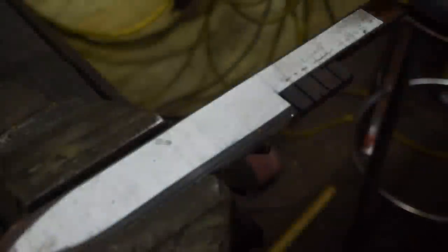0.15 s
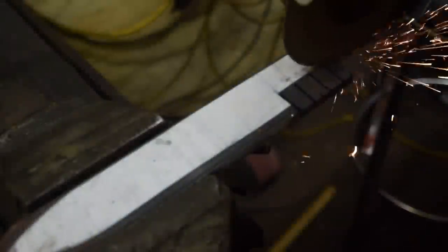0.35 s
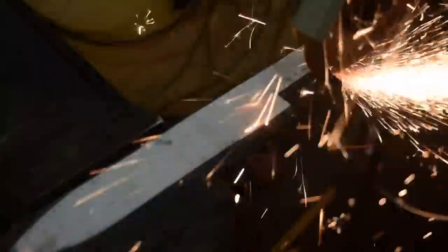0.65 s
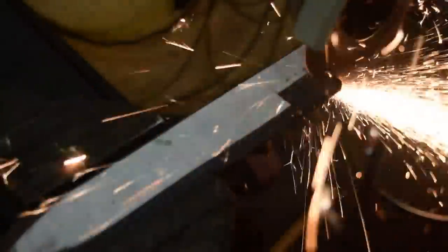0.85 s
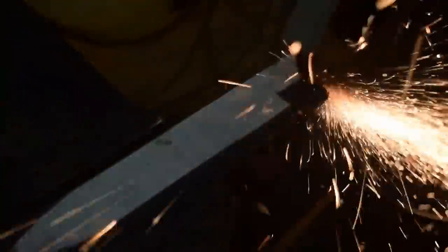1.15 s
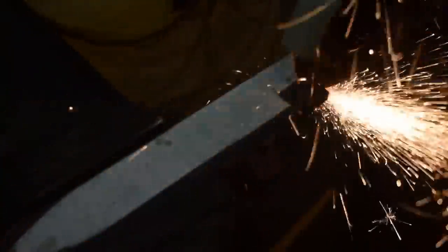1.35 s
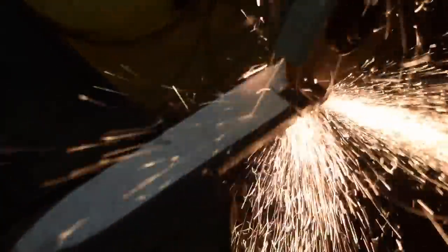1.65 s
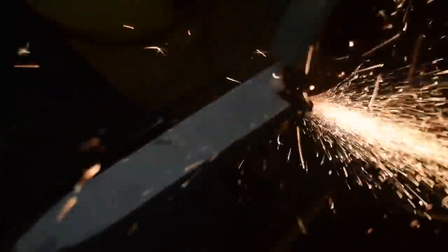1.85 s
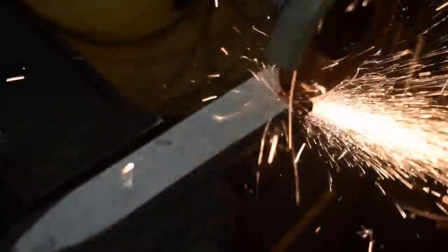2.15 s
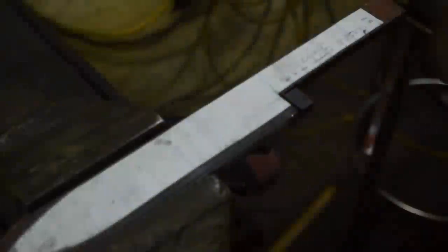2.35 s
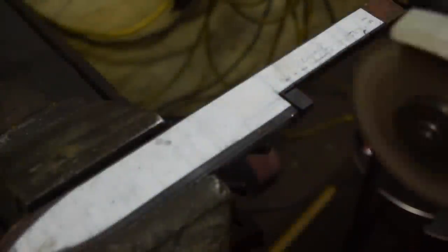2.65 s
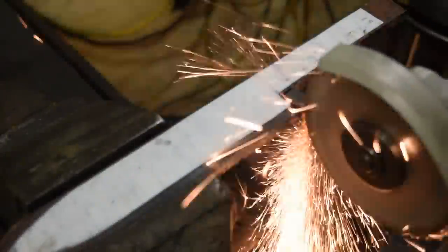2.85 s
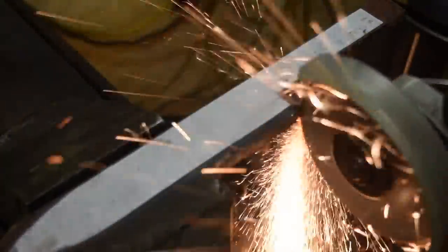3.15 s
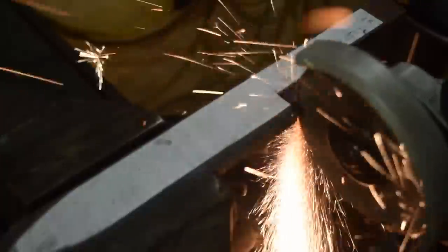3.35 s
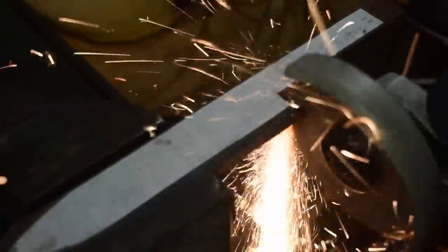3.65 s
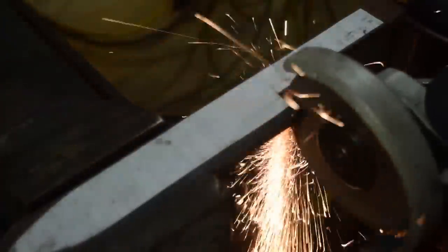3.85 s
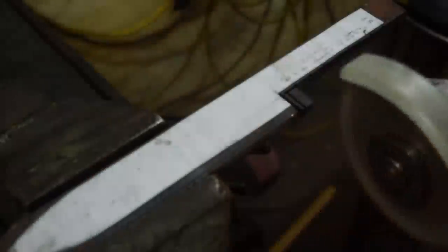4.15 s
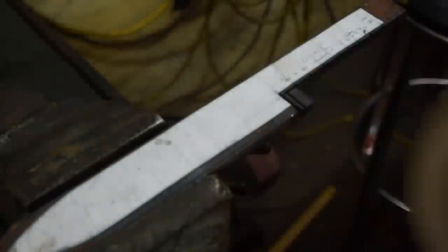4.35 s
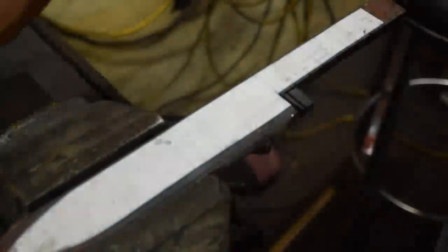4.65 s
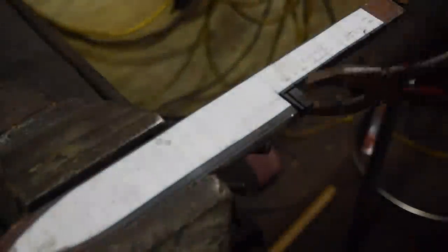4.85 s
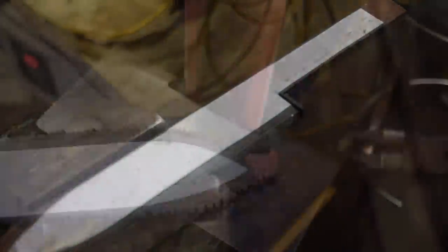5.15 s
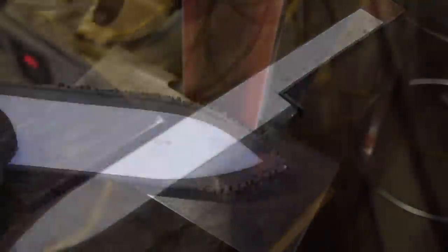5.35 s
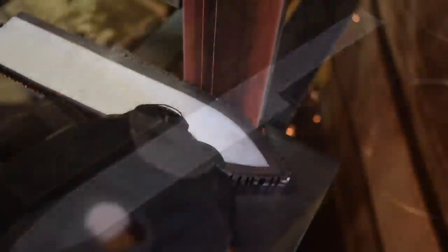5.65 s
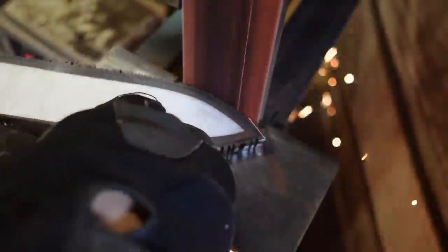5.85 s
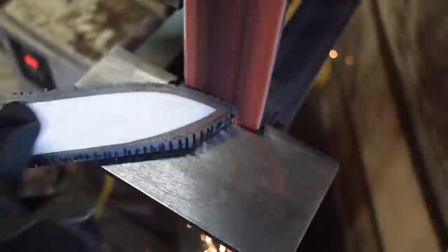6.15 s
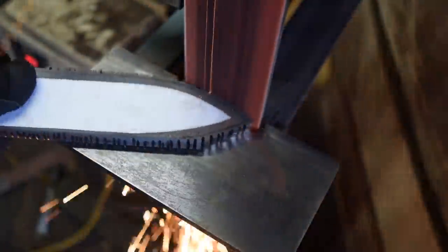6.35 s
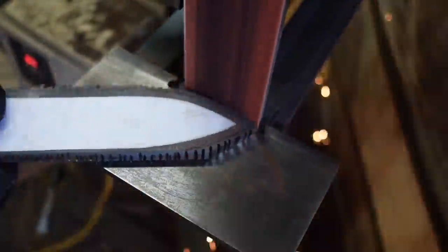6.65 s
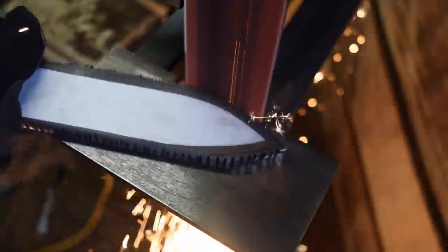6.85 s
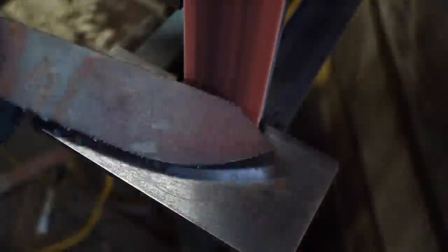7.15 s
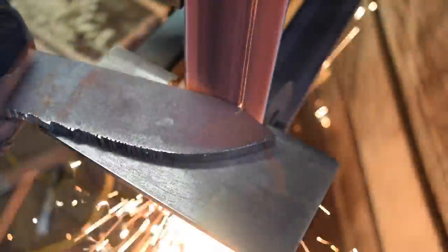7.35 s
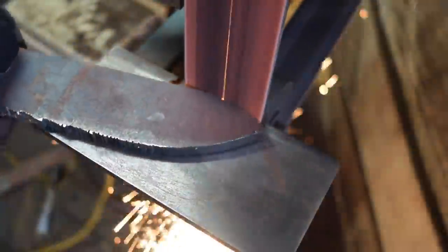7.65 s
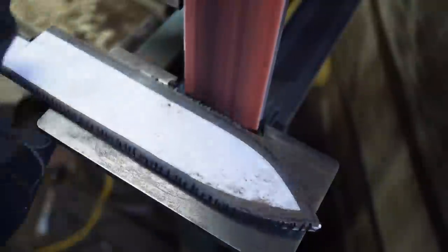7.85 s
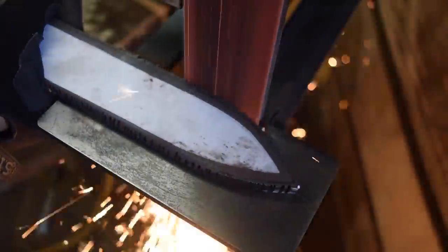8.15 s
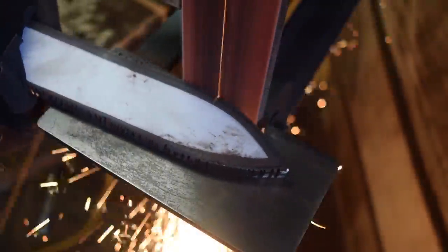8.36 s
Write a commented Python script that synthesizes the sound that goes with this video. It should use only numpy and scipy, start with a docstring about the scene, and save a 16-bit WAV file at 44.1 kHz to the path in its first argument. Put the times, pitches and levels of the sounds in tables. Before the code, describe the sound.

In a workshop, heard very close and almost mono, an angle grinder spins with a bright airy rush, scuffs steel, then cuts in two long gritty bursts with a squealing, sagging motor whine. It coasts down amid small steel clinks. A belt grinder swells up, buzzing and whining over hiss, and a blade blank is pressed on it five times with bright, sizzling screeches. Everything sounds fast and high-pitched, as if sped up.

```python
"""Shaping a steel knife blank in a workshop, heard close by, all fast and high-pitched as in a time-lapse.
From 0 s an angle grinder spins free: shaped noise with gliding whistles. At 0.46 s it grazes the steel, then
cuts at 0.55-2.30 s (one short break) and 2.87-4.20 s: gritty noise and motor tones that sag at each bite.
From 4.48 s it coasts down and steel clinks: short noise bursts. From 4.94 s a belt grinder swells in, a buzzing
whine of overtones over hiss; from 5.61 s the blank is pressed on it five times: grit noise through resonances."""
import sys
import numpy as np
from scipy import signal
from scipy.fft import rfft, irfft
from scipy.io import wavfile

SR = 44100
rng = np.random.default_rng(int(sys.argv[2]) if len(sys.argv) > 2 else 0)


def file_out(sig):
    """Save sig as 16-bit WAV at sys.argv[1]."""
    # one column per channel
    cols = np.atleast_2d(sig).T
    # limit, then scale
    lim = np.clip(cols, -1, 1)
    pcm = np.round(lim * 32767).astype(np.int16)
    wavfile.write(sys.argv[1], SR, pcm)


N = 375291
T = np.arange(N) / SR  # t/s
BINS = np.fft.rfftfreq(N, 1 / SR)  # f/Hz
EDGE_HZ = 15800  # upper band limit

# Angle grinder: disc, motor and gears
# Whistles of the disc: (width/Hz, rows of [t/s, f/Hz, level/dB])
WHISTLES = [ (150, [(0, 9100, -30), (.25, 9060, -34), (.45, 8500, -38)]), (120, [(1.93, 4300, -48),
            (1.98, 4630, -32), (2.01, 4900, -40)]), (80, [(2.3, 9700, -30), (2.45, 9840, -37),
            (2.88, 9900, -29)]), (25, [(2.38, 2860, -50), (2.55, 2900, -47), (2.86, 2870, -49)]),
            (40, [(3.94, 11580, -35), (4.04, 11700, -35)]), (40, [(4.08, 10700, -27), (4.19, 10750, -31)]),
            (59.3, [(4.03, 2700, -52), (4.1, 1390, -48), (4.16, 1400, -49)]), (20, [(4.25, 4730, -41),
            (4.36, 3700, -45), (4.48, 2755, -43.5), (4.56, 2210, -47.5), (4.64, 1770, -57)]),
            (1500, [(4.2, 12100, -47), (4.35, 10000, -29), (4.48, 8900, -27.5), (4.6, 8950, -26.5),
            (4.75, 8600, -42)]), (250, [(4.72, 6260, -40), (4.84, 6350, -48), (4.95, 6200, -47)])]
# Spectrum of the disc spinning free: [f/Hz, level/dB per Hz]
DISC_FREE = [(18, -60), (30, -21), (59, -24), (381, -23.5), (677, -24), (2510, -23.5), (2860, -23),
             (3090, -16.5), (5800, -6.5), (7350, -7.5), (10100, -3.5), (10900, -5.5), (15700, 2.5)]
# Spectrum of the disc in the cut: [f/Hz, level/dB per Hz]
DISC_CUT = [(18, -53), (30, -17.5), (677, -18.5), (752, -17), (1030, -18.5), (1170, -17.5), (1650, -16.5),
            (2710, -17.5), (6110, -5.5), (6610, -3), (7540, -6.5), (11800, -3), (15700, 4.5)]
# Rush of the free disc before its trims: [rumble level/dB, rasp level/dB, fizz level/dB]
FREE_DB = (-41.5, -34.5, -21)
# Change once the grinder is turned over for the last cut: [rumble/dB, rasp/dB, fizz/dB]
TURNED_DB = (-1, 3, -2)
# Extra as the disc bites: [rumble/dB, rasp/dB, fizz/dB]
BITE_DB = (2.5, 1, 1.5)
# Fading as the disc coasts down: [rumble/(dB/s), rasp/(dB/s), fizz/(dB/s)]
COAST_DB_PER_S = (21.5, 15, 47.5)
# Change near the end of the coast, subtracted: rumble and rasp drop, fizz lifts a little:
# [rumble/dB, rasp/dB, fizz/dB]
LATE_COAST_DB = (5, 14, -3)
TURN_S, COAST_S, LATE_COAST_S = 2.52, 4.476, 4.745  # turned over, starts to coast, late change
BITE_S = 0.23  # how fast the bite's extra dies away
# Disc on steel, levels before trims: [from t/s, to t/s, loaded rotor pitch f/Hz, sag time/s,
# gear whine level/dB, rumble level/dB, rasp level/dB, fizz level/dB]
CUTS = [(0.459, .5, 1400, .04, -50, -34, -27.5, -36), (.55, 2.113, 1110, .042, -35, -42, -35.5, -26.5),
        (2.144, 2.297, 1122, .04, -34, -42.5, -36, -25.5), (2.869, 4.196, 1150, .19, -35, -41, -32.5, -26)]
# Upper orders of the rotor, one list before and one after the turn: [multiple of rotor pitch, level/dB]
GEAR_ORDERS = [
    [(7, -8.5), (9, -8.5), (11, -11), (12, -4), (13, 3.5), (14, 3)],
    [(9, -9), (11, -9), (12, -3), (13, 5)],
]
# The hand eases off and the rotor picks up: [t/s, half length/s, pitch rise/Hz]
EASINGS = [(0.936, 0.033, 15.8), (1.06, .04, 12), (1.207, .075, 44), (1.431, 0.097, 12),
           (1.67, 0.0348, 10.9), (1.9, .12, 44), (4.132, 0.2, 176)]
# The blade squeals on the rotor's 6th order: [t/s, half length/s, level/dB]
SQUEALS = [(0.799, .1, -34.5), (.93, 0.095, -26.5), (1.193, 0.056, -30.5), (1.32, .03, -33),
           (1.56, 0.091, -25.5), (1.658, .045, -22.5), (1.9, 0.15, -30.5), (2.086, 0.025, -36),
           (2.192, 0.018, -23.5), (3.44, 0.055, -43)]
SQUEAL_REST_DB = -42.5
FREE_HZ = 1450  # rotor pitch with no load
EASED_DB, EASED_HZ = 5.5, 40  # most the gears gain, and the pitch rise that brings most of it
# Wavering low whistles during the cuts, one list each: [t/s, centre f/Hz, swings per s, level/dB]
WARBLES = [
    [(1.75, 1097, 7.6, -50), (1.87, 500, 12, -50), (1.98, 281.3, 12, -55), (2.25, 324, 12, -54)],
    [(2.87, 702, 7.3, -49), (3.12, 858, 15.4, -44.5), (3.45, 753.5, 24, -49), (3.76, 749, 29, -49),
     (3.98, 596, 8.5, -62)],
]
# Strength of each warbling tone, the folded-down one first: [level/dB]
WARBLE_DB = (-5.5, 1, 0.5, 0, 3)

# Steel on steel
# Knocks and scrapes: [t/s, level/dB, ringing f/Hz, length/s, share of broad scrape 0-1]
KNOCKS = [(0.458, -21, 5800, 0.022, 0.98), (0.486, -22, 5700, 0.011, 1), (0.534, -26, 4500, .008, .9),
          (0.626, -22.5, 4730, .006, 1), (1.149, -23, 4500, .01, 0.98), (4.716, -25.5, 4300, 0.0031, 0.85),
          (4.936, -27, 6800, 0.0085, 0.06), (4.975, -44, 7400, .007, .3), (5.036, -39, 6750, 0.013, 0.2),
          (5.19, -39, 6200, .012, 0.3), (5.4455, -19.5, 6060, 0.0058, 0.37),
          (5.673, -30.5, 1800, 0.012, 0.8), (6.585, -23, 3970, 0.0058, 0.96),
          (7.248, -32, 3450, 0.024, 0.28)]
# Spectrum of the broad scrape: [f/Hz, level/dB per Hz]
SCRAPE = [(60, -9), (400, -13), (1400, -1), (2200, -8), (3500, 2.5), (7500, 1.5), (10000, 10), (15000, -11)]

# Belt grinder and blank
# Whine of the wheels and bearings before trims: [f/Hz, level/dB]
WHINE = [(3827, -47), (5740, -44), (6218, -43), (6288, -41), (6455, -44), (6697, -35), (7171, -43),
         (7652, -38), (8129, -35), (9561, -39), (10040, -32), (10519, -36), (10998, -31), (11316, -38),
         (11477, -32), (11956, -34), (12575, -33), (12909, -35), (13205, -34), (13388, -38), (13647, -40),
         (13867, -39), (14465, -34), (14863, -40), (15089, -33), (15299, -38)]
# Turning parts: [f/Hz, level of all their overtones/dB]
WHEELS = [(481.7, -31.5), (208.2, -28.5), (120.8, -35.5)]
# Spectrum of the running belt: [f/Hz, level/dB per Hz]
BELT_AIR = [(18, -71), (30, -24.5), (212, -24.5), (306, -25), (418, -25), (2110, -25), (2340, -23.5),
            (6470, -7.5), (15300, 0)]
SWELL_START_S, SWELL_S, SWELL_POWER, SWELL_DB = 4.941, 0.67, 1.59, 1
BELT_SAG, BELT_LAG_S = .035, .05  # share of speed lost under load, and how slowly the wheels follow
# Blank pressed on the belt, levels before trims:
# [from t/s, to t/s, rasp level/dB, screech level/dB, rumble level/dB]
PASSES = [(5.612, 6.221, -37.5, -21.5, -42), (6.281, 6.719, -38, -19.5, -43.5),
          (6.795, 7.165, -40, -20, -44.5), (7.275, 7.769, -42.5, -18.5, -45),
          (7.965, 8.6, -39.5, -20.5, -44.5)]
# Spectrum of grit on steel: [f/Hz, level/dB per Hz]
GRIT = [(2800, -36.5), (3300, -4), (3700, -6), (4400, -4), (5200, -21), (5900, -8), (6800, -9),
        (7900, -7.5), (8900, -5), (9600, -0.5), (10200, 7), (11900, 3.5), (12600, 5), (15700, -13)]
# Bending modes of the blank: [f/Hz, width/Hz, level against the rasp/dB]
BENDING = [(3805, 140, -7), (4520, 260, -6), (5980, 150, -2.5), (8160, 430, 2)]
# Resonances of the blank against the belt, before the screech trim: [f/Hz, width/Hz, level/dB]
BLANK = [(10210, 450, -7.5), (11200, 210, -8), (11700, 130, -13.5)]
TOUCH_S, TOUCH_RUMBLE_DB, TOUCH_RASP_DB = 0.032, 4.5, 2.5  # rough scuff at the start of a pass
SETTLE_S, SETTLE_DB = .08, 1.5  # the screech builds as the blank settles on the belt
SLIDE_FROM, SLIDE_TO = 0.96, 1.037  # retuning of the bending modes along each pass
IDLE_RUMBLE_DB = -44

# Faint diffuse side, mostly low: [f/Hz, side level against mid/dB]
SIDE_DB = [(300, -11.5), (1000, -15), (2500, -37.5), (8000, -54.5)]


def amp(db):
    """Decibels to gain."""
    return 10 ** (np.asarray(db) / 20)


def unit(x):
    """Scales to rms 1."""
    return x / np.sqrt(np.mean(x ** 2) + 1e-20)


def curves(rows):
    """Each column of a table after the time, joined by straight lines in time."""
    s, *columns = np.transpose(rows)
    return [np.interp(T, s, column) for column in columns]


def read(points, hz):
    """A spectrum's gain at hz."""
    f, db = np.transpose(points)
    return amp(np.interp(np.log(hz + 1), np.log(f + 1), db))


def gate(start, end, fade=0.0058):
    """One between two times, with ramps of fade seconds centred on them."""
    return np.clip(np.minimum(T - start, end - T) / fade + .5, 0, 1)


def bump(s, half_length):
    """A smooth hump of height one around a time."""
    return np.exp(-((T - s) / half_length) ** 2)


def since(start):
    """Seconds since a time; zero before it."""
    return np.maximum(T - start, 0)


def white():
    """Plain noise."""
    return rng.standard_normal(N)


def colour(x, gain):
    """Filters by a gain per frequency; rms 1."""
    return unit(irfft(rfft(x) * gain, N))


def drift(rate):
    """Random wandering up to about rate per second; rms 1."""
    s = np.arange(0, T[-1] + 1, 1 / 2000)
    smoothing = 1 + (np.fft.rfftfreq(len(s), s[1]) / rate) ** 2
    wander = irfft(rfft(rng.standard_normal(len(s))) / smoothing, len(s))
    return unit(np.interp(T, s, wander))


def flutter():
    """Gain of a tone that keeps breaking off and coming back."""
    return np.clip(1 + .7 * drift(30), 0, 2)


def above(hz):
    """Gain of a steep high-pass; its power complement is the low-pass."""
    return np.sqrt(1 - 1 / (1 + (BINS / hz) ** 16))


def below(hz):
    """Gain of a steep low-pass."""
    return np.sqrt(1 - above(hz) ** 2)


def ring(x, hz, width):
    """A steep resonance that follows hz: shift down to zero, smooth, shift back; rms 1."""
    turn = np.exp(2j * np.pi * np.cumsum(hz * np.ones(N)) / SR)
    r = np.exp(-np.pi * 1.5 * width / SR)
    smoothed = signal.lfilter([1], [1, -2 * r, r * r], x / turn)
    return unit((turn * smoothed).real)


def grains(per_s, spread_db):
    """Grit striking steel: dense clicks of unequal size over a bed of noise."""
    size = amp(spread_db * np.minimum(rng.exponential(1, N), 3))
    clicks = white() * size * (rng.random(N) < per_s / SR)
    return unit(unit(clicks) + white())


def dense_echoes(decay_s):
    """Spectrum of a dense, decaying burst of random echoes; energy 1."""
    echoes = white() * np.exp(-T / decay_s)
    return rfft(echoes / np.linalg.norm(echoes))


def disc_levels():
    """Gains of rumble, rasp and fizz, free and cutting: the free rush gives way while the disc is loaded."""
    turned, late = gate(TURN_S, 9, fade=0.64), gate(LATE_COAST_S, 9, fade=.08)
    free = [db + turn * turned - coast * since(COAST_S) - change * late
            for db, turn, coast, change in zip(FREE_DB, TURNED_DB, COAST_DB_PER_S, LATE_COAST_DB)]
    load, power = np.zeros(N), np.zeros((3, N))
    for start, end, _, _, _, *levels in CUTS:
        touch, bite = gate(start, end, fade=0.031), np.exp(-since(start) / BITE_S)
        load += touch
        power += [touch * amp(db + extra * bite) ** 2 for db, extra in zip(levels, BITE_DB)]
    return amp(free) * np.sqrt(np.clip(1 - load, 0, 1)), np.sqrt(power)


def disc_noise():
    """Rush of the disc; in the cut its colour changes and the grit makes it sputter."""
    free, cutting = disc_levels()
    out = np.zeros(N)
    for gains, shape, rasp_lift_db, fizz_lift_db in [(free, DISC_FREE, 2.3, 2.4), (cutting, DISC_CUT, 2.6, 3.2)]:
        sputter = amp(0.5 * drift(74) + .8 * drift(15))
        grit = grains(per_s=14000, spread_db=-1.5) * sputter
        body = read(shape, BINS)
        rumble = colour(white(), body * below(2950)) * amp(-1.42 + 1.54 * drift(46))
        rasp = colour(grit, body * above(2760) * below(7350)) * amp(rasp_lift_db)
        fizz = colour(grit, body * above(8200) * below(15780)) * amp(fizz_lift_db)
        out += (gains * [rumble, rasp, fizz]).sum(axis=0)
    return out


def whistles():
    """Narrow rushes of the disc: noise through resonances that glide; the pitch falls during the coast."""
    out = np.zeros(N)
    for width, rows in WHISTLES:
        hz, db = curves(rows)
        out += ring(white(), hz, width) * amp(db) * gate(rows[0][0], rows[-1][0])
    return out


def knocks():
    """Short rubs of steel on steel: a burst of ringing, narrow noise mixed with a broad scrape."""
    out, scrape = np.zeros(N), colour(white(), read(SCRAPE, BINS))
    for s, db, hz, length, share in KNOCKS:
        age = since(s)
        shape = np.minimum(age / .0005, 1) / (1 + (age / length) ** 4)
        ringing = ring(white(), hz, 590)
        out += amp(db) * shape * (np.sqrt(1 - share) * ringing + np.sqrt(share) * scrape)
    return out


def rotor_whine():
    """Orders of the motor and gears sag as the disc bites, trembling with the hand; gear orders flutter alone."""
    hz, whine_db, cutting = FREE_HZ, 0, 0
    for start, end, loaded_hz, sag_s, db, *_ in CUTS:
        begun = T > start - .01
        hz = np.where(begun, loaded_hz + (FREE_HZ - loaded_hz) * np.exp(-since(start) / sag_s), hz)
        whine_db = np.where(begun, db, whine_db)
        cutting = cutting + gate(start, end)
    # with less load the rotor picks up and the gears sing louder
    eased_hz = sum(rise * bump(s, half) for s, half, rise in EASINGS)
    whine_db = whine_db + EASED_DB * np.tanh(eased_hz / EASED_HZ)
    squeal = amp(SQUEAL_REST_DB) + sum(amp(db) * bump(s, half) for s, half, db in SQUEALS)
    tremble = 1 + .0022 * drift(25) + .0022 * drift(300)
    phase = 2 * np.pi * np.cumsum((hz + eased_hz) * tremble) / SR
    sixth_order = np.sin(6 * phase) * squeal * amp(2.64 * drift(85))
    half_order = np.sin(7 / 2 * phase) * amp(-48 + 1.3 * drift(30))
    gears = sum(amp(db) * flutter() * np.sin(k * phase) * held
                for orders, held in zip(GEAR_ORDERS, [T < TURN_S, T >= TURN_S]) for k, db in orders)
    return np.sqrt(2) * (sixth_order + half_order + gears * amp(whine_db + 2)) * cutting


def warble(rows):
    """Wavering tones swing up and down, break up and wander apart."""
    centre, swings, db = curves(rows)
    turns, out = np.cumsum(swings * (T > rows[0][0])) / SR, np.zeros(N)
    for k, partial_db in enumerate(WARBLE_DB, -1):
        depth = np.minimum(260 + 70 * k, centre / 2)  # Hz
        swing = depth * np.sin(2 * np.pi * turns + 1.1 * drift(9))
        spacing = 1050 + 70 * drift(8)
        hz = abs(centre + k * spacing + swing + 70 * drift(30))  # below zero folds back up
        breaking_up = np.clip(.9 + .8 * drift(35), 0, 1.8)
        out += np.sin(2 * np.pi * np.cumsum(hz) / SR) * amp(db + partial_db) * breaking_up
    return np.sqrt(2) * out * gate(rows[0][0], rows[-1][0])


def swell():
    """Gain of the belt grinder as it swells in."""
    return amp(SWELL_DB) * np.minimum(since(SWELL_START_S) / SWELL_S, 1) ** SWELL_POWER


def pressed():
    """One while the blank touches the belt."""
    return sum(gate(start, end, fade=0.014) for start, end, *_ in PASSES)


def belt_running():
    """Wheels and bearings sing in dense overtones over belt hiss; load slows them and makes them unsteady."""
    load = pressed()
    lag = np.exp(-1 / (BELT_LAG_S * SR))
    sag = BELT_SAG * signal.lfilter([1 - lag], [1, -lag], load) * load
    unsteady = 0.000301 * drift(8.4) + 0.00124 * load * drift(24.8)
    clock = T + np.cumsum(unsteady - sag) / SR  # time as the wheels turn
    out = amp(-25) * colour(white(), read(BELT_AIR, BINS) * above(3250) * below(16000))
    whine = sum(amp(db) * np.sin(2 * np.pi * (hz * clock + rng.random())) for hz, db in WHINE)
    out += np.sqrt(2) * whine * amp(-2.5 - 16 * load)
    for hz, db in WHEELS:
        # every turn repeats the same roughness: overtones of random phase and strength
        orders = np.arange(2049) * hz
        strength = np.exp(2j * np.pi * rng.random(len(orders))) * rng.random(len(orders))
        turn = irfft(strength * read(BELT_AIR, orders) * (orders > 300) * (orders < EDGE_HZ))
        place = np.linspace(0, 1, len(turn), endpoint=False)
        out += amp(db) * unit(np.interp(hz * clock % 1, place, turn))
    early_tone = amp(-48) * np.sin(2 * np.pi * 2068 * clock) * gate(5, 5.58)
    # a low drone sounds in two of the gaps between passes
    drone = amp(-49) * np.sin(2 * np.pi * 419 * clock) * (.5 * gate(7.17, 7.27) + gate(7.78, 7.96))
    return (out + early_tone) * swell() + drone


def pass_controls():
    """Rumble, rasp and screech dB and the tuning of the blank: every pass scuffs, settles and slides."""
    rumble_db, rasp_db, screech_db, slide = np.full(N, float(IDLE_RUMBLE_DB)), 0, 0, 1
    for start, end, rasp, screech, rumble in PASSES:
        begun, scuff = T > start - .02, bump(start, TOUCH_S)
        progress = np.minimum(since(start) / (end - start), 1)
        rumble_db = rumble_db + (rumble - IDLE_RUMBLE_DB) * gate(start, end) + TOUCH_RUMBLE_DB * scuff
        rasp_db = np.where(begun, rasp + TOUCH_RASP_DB * scuff, rasp_db)
        screech_db = np.where(begun, screech - SETTLE_DB * np.exp(-since(start) / SETTLE_S), screech_db)
        # the contact slides along the blank and retunes its bending modes
        slide = np.where(begun, SLIDE_FROM + (SLIDE_TO - SLIDE_FROM) * progress ** 2, slide)
    return rumble_db, rasp_db, screech_db, slide


def comb(x, feedback):
    """The same grit comes round with every turn of the wheel, which combs the noise."""
    one_turn_later = np.exp(-2j * np.pi * BINS / WHEELS[1][0])
    return colour(x, 1 / (0.5 - feedback * one_turn_later))


def belt_grinding():
    """Grit tears at the blank in each pass and sets it ringing; the blank chatters in the hand."""
    rumble_db, rasp_db, screech_db, slide = pass_controls()
    grit = grains(per_s=9000, spread_db=3.5)
    held_still = gate(8.06, 9, fade=.1)  # the combing is strong only here
    grit = (1 - held_still) * comb(grit, .04) + held_still * comb(grit, .35)
    grit = grit * amp(drift(130))  # chatter
    body = read(GRIT, BINS)
    rasp = colour(grit, body * above(3050) * below(5700))
    rasp += sum(amp(db + 2 * drift(10)) * ring(grit, hz * slide, width) for hz, width, db in BENDING)
    screech = amp(1.94) * colour(grit, body * above(6000) * below(16500))
    # the shifting contact favours now one resonance, now another
    screech += sum(amp(db + 2 * drift(8)) * ring(grit, hz * (1 + .006 * drift(12)), width)
                   for hz, width, db in BLANK)
    rumble = colour(white(), read(BELT_AIR, BINS) * below(2900)) * amp(rumble_db - 0.9 + 1.1 * drift(40))
    return pressed() * (rasp * amp(rasp_db) + screech * amp(screech_db - 1.27)) + rumble * swell()


def scene():
    """Both machines close to the microphones, nearly mono, with a faint diffuse side."""
    # echoes from the guard and the bench cut fine fixed bands into the rush of the disc
    bench = 1 + .27 * dense_echoes(decay_s=.005) * above(3000)
    rush = irfft(rfft(disc_noise()) * bench, N) * gate(-1, 4.99, fade=0.12)
    angle_grinder = rush + whistles() + rotor_whine() + sum(map(warble, WARBLES))
    mid = angle_grinder + knocks() + belt_running() + belt_grinding()
    side = irfft(rfft(mid) * dense_echoes(decay_s=.05) * read(SIDE_DB, BINS), N)
    return np.array([mid + side, mid - side])


def record(dry):
    """The highest peaks are rounded; then a steep band limit."""
    rounded = dry / (1 + (dry / .75) ** 6) ** (1 / 6)
    low_pass = signal.firwin(1023, EDGE_HZ, window=("kaiser", 9), fs=SR)
    return signal.oaconvolve(rounded, low_pass[None], "same")


dry = scene()
out = record(dry)
file_out(out)
```